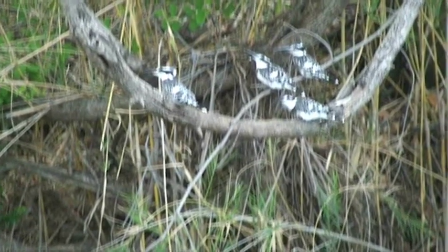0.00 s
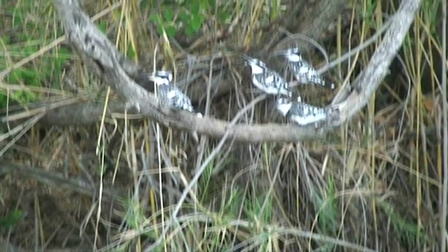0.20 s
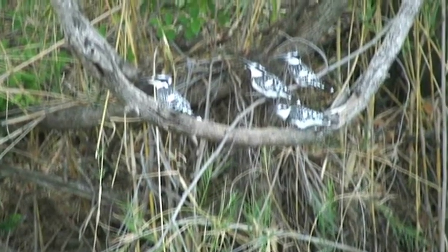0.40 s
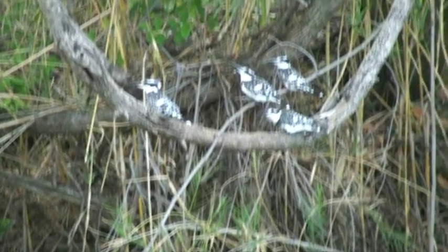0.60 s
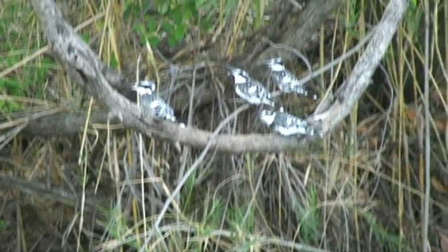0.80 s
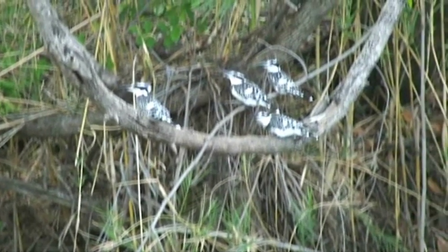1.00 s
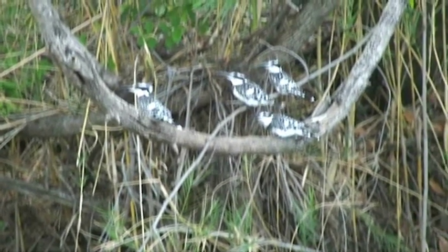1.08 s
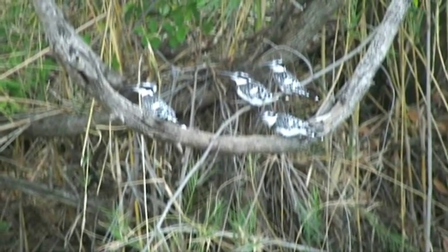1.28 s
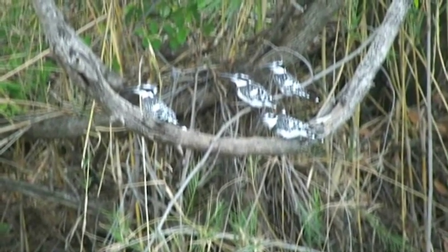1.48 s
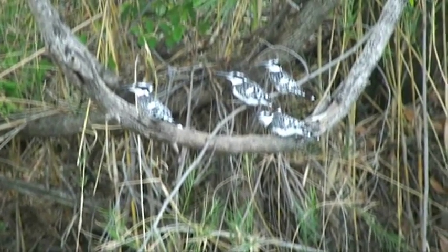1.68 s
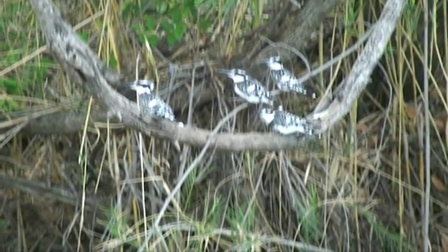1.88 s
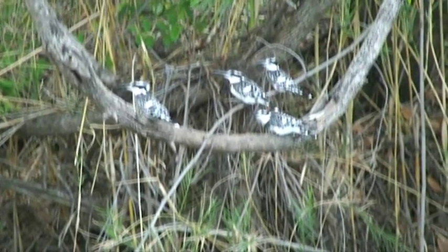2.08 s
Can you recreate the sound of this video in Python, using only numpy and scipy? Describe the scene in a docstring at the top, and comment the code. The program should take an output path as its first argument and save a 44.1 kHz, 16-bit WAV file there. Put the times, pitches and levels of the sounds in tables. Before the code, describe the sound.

Kingfisher calls: two piercing down-swept chirps, rapid short chattering notes, then faint distant chirps over river hiss

```python
"""A riverside: throughout, the river hisses as patchy noise, wind rumbles on the microphone as two swelling noise
bands, and a hum wavers as two narrow noise bands. From 0.24 s a near kingfisher in the reeds gives two falling
whistles and a quick chatter; faint notes follow from birds further off, at 1.35 s to the right and 1.99 s to the left.
Each note is a gliding tone with two weak overtones and broadband treble noise that follows its level, scattered back
by reeds and far bank."""
import sys
import numpy as np
from scipy import signal
from scipy.fft import rfft, irfft, next_fast_len
from scipy.io import wavfile
from scipy.ndimage import uniform_filter1d

SR = 44100
rng = np.random.default_rng(int(sys.argv[2]) if len(sys.argv) > 2 else 0)


def put_to_file(sound):
    """Save the sound as 16-bit audio at rate SR, in the file named by the first command-line argument."""
    columns = np.atleast_2d(sound).T  # one column per channel
    safe = np.clip(columns, -1, 1)
    whole_steps = np.round(safe * 32767)
    wavfile.write(sys.argv[1], SR, whole_steps.astype(np.int16))


N = 97020  # samples, 2.2 s


def amp(db):
    """Amplitude ratio of a level in dB: 20 dB a decade."""
    return 10 ** (np.asarray(db) / 20)


def unit(x):
    """Normalisation to an rms of 1."""
    return x / np.sqrt(np.mean(x ** 2) + 1e-20)


def along(points, hz):
    """Linear interpolation of (f/Hz, value) points on a logarithmic frequency axis."""
    f, value = np.transpose(points)
    return np.interp(np.log(hz + 1), np.log(f + 1), value)


def filtered(x, response):
    """Linear filtering: the spectrum is multiplied by a complex response of frequency."""
    padded = next_fast_len(N + SR // 2)
    return irfft(rfft(x, padded) * response(np.fft.rfftfreq(padded, 1 / SR)), padded)[..., :N]


def panned(db):
    """Interchannel level difference: left and right gains that differ by db."""
    return amp(np.array([db / 2, -db / 2]))


def correlated(pair, likeness, gain):
    """Mid-side mixing: independent noises at cos and sin of half an angle correlate as its cosine."""
    def response(hz):
        half_angle = np.arccos(along(likeness, hz)) / 2
        return gain(hz) * np.array([np.cos(half_angle), np.sin(half_angle)])

    mid, side = filtered(pair, response)
    return np.array([mid + side, mid - side])


def rush(spectrum, patchy_db, band=lambda hz: 1):
    """Turbulence noise: random stereo noise of rms 1 whose gain varies in patches of time and frequency."""
    # left-right correlation: f/Hz, likeness/1
    likeness = [(30, .62), (60, .72), (130, .95), (290, .85), (640, .55), (1400, .57), (3000, .5),
                (7000, .5), (15000, .85)]
    # left-right balance: f/Hz, level difference/dB
    balance = [(30, 2), (110, 1), (380, .6), (700, -1.2), (1300, -.9), (4400, -1.2), (8100, -1),
               (15000, .1)]
    cells = signal.stft(rng.standard_normal((2, N)), nperseg=512)[2]
    patches = uniform_filter1d(rng.standard_normal(cells.shape[1:]), 6, axis=0)
    patches = unit(uniform_filter1d(patches, 14, axis=1))
    pair = signal.istft(cells * amp(patchy_db * patches), nperseg=512)[1][:, :N]
    stereo = correlated(pair, likeness, lambda hz: band(hz) * amp(along(spectrum, hz)))
    return unit(filtered(stereo, lambda hz: panned(along(balance, hz))))


def river():
    """Broadband flow noise: the hiss of the river falls away toward the treble."""
    # relative spectrum: f/Hz, level/dB
    spectrum = [(170, -13), (260, -1), (500, 0), (750, -3.5), (1000, -6.5), (1600, -10.5), (2200, -14.5),
                (3200, -17), (5000, -19), (6300, -20.5), (8000, -26.5), (10000, -32.5), (13000, -42),
                (14700, -43), (15300, -58)]
    return amp(-41) * rush(spectrum, patchy_db=0.94)


def wind():
    """Turbulent pressure on the microphone: deep and upper rumble swell independently."""
    # relative spectrum: f/Hz, level/dB
    spectrum = [(10, -27), (22, -0.5), (40, -2.5), (130, -4.5), (200, -8), (260, -17.5), (330, -56)]
    # swells: t/s, deep rumble level/dB, upper rumble level/dB
    swells = [(0.0, -34.5, -44.5), (0.12, -38, -41.5), (0.14, -46.5, -48.5), (0.26, -40, -41),
              (0.35, -39, -49), (0.51, -47.5, -47), (0.53, -41, -42), (0.84, -40.5, -46),
              (0.86, -48.5, -42), (1.14, -45.5, -47.5), (1.19, -42.5, -41), (1.41, -46.5, -46.5),
              (2.14, -45.5, -48.5), (2.2, -49, -43)]
    split_hz = 110
    s, deep_db, upper_db = np.transpose(swells)
    t = np.arange(N) / SR
    deep = rush(spectrum, patchy_db=0.5, band=lambda hz: hz < split_hz)
    upper = rush(spectrum, patchy_db=1.5, band=lambda hz: hz >= split_hz)
    return amp(np.interp(t, s, deep_db)) * deep + amp(np.interp(t, s, upper_db)) * upper


def hum():
    """Narrow-band noise: a band of finite width is heard as a tone that wavers."""
    # bands: centre f/Hz, full width at half amplitude/Hz, level/dB, phase lead of left over right/rad
    bands = [(593.5, 22.5, -46.5, -0.59), (791, 66, -50.5, -1.95)]
    out = np.zeros((2, N))
    for hz, width_hz, db, lead in bands:
        def resonance(f):
            channel_phase = np.exp(.5j * lead * np.array([[1], [-1]]))
            return channel_phase / (1 + (2 * (f - hz) / width_hz) ** 2)

        out += amp(db) * unit(filtered(rng.standard_normal(N), resonance))
    return out


def note(rows):
    """Harmonic series on a gliding fundamental, and broadband treble noise that follows its level."""
    # third partial relative to the second: f of third partial/Hz, level/dB
    third_db = [(9000, -14), (11500, -13.5), (13500, -12), (15000, -31)]
    # relative spectrum of the treble noise: f/Hz, level per Hz/dB
    wash_spectrum = [(2000, -32), (3000, -17), (6000, 6.5), (9000, -2), (11000, -3), (15500, -11)]
    attack_s, release_s = .0006, .004
    wash_db = -30  # relative to the fundamental, in the straight sound
    t = np.arange(N) / SR
    s, hz, db, second_db = np.transpose(rows)
    pitch = uniform_filter1d(np.interp(t, s, hz), size=45)  # glide rounded over 1 ms
    phase = 2 * np.pi * np.cumsum(pitch) / SR
    gate = np.clip(np.minimum((t - s[0]) / attack_s, (s[-1] - t) / release_s) + .5, 0, 1)
    level = amp(np.interp(t, s, db))
    noise = unit(filtered(rng.standard_normal(N), lambda f: amp(along(wash_spectrum, f))))
    wash = level * amp(wash_db) * noise
    third_gain = amp(along(third_db, 3 * pitch)) * (3 * pitch < SR / 2)  # silent if it would alias
    overtones = np.sin(2 * phase) + third_gain * np.sin(3 * phase)
    tone = level * np.sin(phase) + amp(np.interp(t, s, second_db)) * overtones
    return gate * np.sqrt(2) * tone, gate * wash


def reeds(x, reeds_db, starts_s, t60, bank_db, delay_s, spread_s):
    """Diffuse scattering: echoes from near stems decay exponentially; the far bank answers in a later swell."""
    # left-right correlation of the echoes: f/Hz, likeness/1
    likeness = [(5500, 0.86), (8500, 0.38), (13000, .9)]
    # echo colour: f/Hz, gain/dB
    colour = [(2800, -1.5), (4500, -2), (7000, 1.5), (10000, 1), (14000, -4.5)]
    builds_s = 0.0014
    t = np.arange(SR // 2) / SR
    stems = (1 - np.exp(-np.clip(t - starts_s, 0, 9) / builds_s)) * amp(-60 * t / t60)
    bank = np.exp(-((t - delay_s) / spread_s) ** 2 / 2) * (t > starts_s)
    stems *= amp(reeds_db) / np.linalg.norm(stems)
    bank *= amp(bank_db) / np.linalg.norm(bank)
    scatter = rng.standard_normal((2, len(t))) * np.hypot(stems, bank)
    wet = signal.fftconvolve(x[None], scatter, axes=1)[:, :N]
    return correlated(wet, likeness, lambda hz: amp(along(colour, hz)))


def bird(notes, place):
    """Superposition of direct and scattered sound; every note has its own random scatter."""
    # treble balance of the microphone's left port: f/Hz, left-right level difference/dB
    port_balance = [(5500, -1), (8500, 2.5)]
    echo_wash_db = 11.5  # the treble noise is this much stronger in the echoes
    pan_db, reeds_db, echo_pan_db, *echo_times = place
    voices = [note(rows) for rows in notes]
    straight = sum(tone + wash for tone, wash in voices)
    wet = sum(reeds(tone + amp(echo_wash_db) * wash, reeds_db, *echo_times) for tone, wash in voices)
    heard = panned(pan_db)[:, None] * straight + panned(echo_pan_db)[:, None] * wet
    return filtered(heard, lambda hz: panned(along(port_balance, hz)))


def near_bird():
    """Frequency glides: two falling whistles and a chatter of shorter notes."""
    # one curve a note, before panning: t/s, f/Hz, level/dB, level of second partial/dB
    whistles = [
        [(0.236, 7370, -37, -72), (0.24, 7090, -32.5, -43), (0.245, 5920, -22.5, -42), (0.25, 5220, -19, -38),
         (0.2555, 4470, -14, -35.5), (0.265, 4170, -13, -26), (0.277, 3890, -19, -34), (0.282, 3780, -16, -38),
         (0.295, 3505, -29.5, -51), (0.31, 3600, -24, -50), (0.318, 3460, -33, -62), (0.326, 2970, -31, -60)],
        [(0.364, 6490, -24.5, -53), (0.368, 5775, -17.5, -33), (0.371, 4960, -16.5, -38),
         (0.374, 4620, -11.5, -26), (0.378, 4100, -18, -29), (0.385, 3540, -22.5, -43),
         (0.394, 3086, -29.5, -49), (0.403, 3005, -37, -51), (0.412, 2996, -29, -59)],
    ]
    chatter = [
        [(0.351, 5700, -37, -56), (0.354, 5850, -24, -43), (0.358, 6430, -31, -45)],
        [(0.359, 7490, -32, -80), (0.364, 7090, -33, -63)],
        [(0.4935, 3580, -34, -72), (0.496, 4410, -22, -37), (0.499, 4830, -15, -37), (0.502, 4670, -19, -41),
         (0.506, 4370, -24, -38), (0.511, 4380, -30, -40)],
        [(0.525, 7410, -44, -60), (0.529, 7060, -29, -50)],
        [(0.529, 5850, -28, -55), (0.532, 5700, -18, -41), (0.536, 5020, -16, -45), (0.54, 4400, -14.5, -29),
         (0.543, 3810, -23, -31.5), (0.546, 3280, -33, -45), (0.555, 3060, -33, -67)],
        [(0.579, 5430, -32, -67), (0.582, 5120, -20, -48), (0.584, 4500, -19, -38), (0.588, 3890, -24, -34),
         (0.591, 3120, -33.5, -47), (0.595, 2570, -42, -73)],
        [(0.621, 6510, -38, -63), (0.624, 5920, -30.5, -64), (0.628, 5250, -18, -40), (0.63, 4740, -19, -47),
         (0.634, 3860, -20.5, -32), (0.638, 2930, -41, -57), (0.643, 2660, -36, -72)],
        [(0.6605, 3780, -44, -47), (0.662, 3930, -20.5, -47), (0.666, 4210, -24, -49),
         (0.67, 3780, -22.5, -38.5), (0.672, 3180, -38.5, -51), (0.676, 2580, -32.5, -66)],
    ]
    # place: left-right/dB, reeds/dB, left-right of echoes/dB, reeds start/s, reeds t60/s,
    # far bank/dB, bank delay/s, bank spread (standard deviation)/s
    place = (-2.5, -5.5, -1.5, .007, 0.28, -19, .06, 0.07)
    return bird(list(whistles) + list(chatter), place)


def right_bird():
    """Level difference places this fainter bird to the right."""
    # notes and place, columns as in near_bird
    notes = [
        [(1.346, 4160, -60, -72), (1.354, 4170, -56, -64), (1.361, 4220, -49, -57), (1.367, 5400, -41, -72)],
        [(1.369, 4290, -46, -59), (1.374, 6490, -44.5, -82), (1.379, 7470, -49, -80), (1.383, 6260, -40, -83),
         (1.386, 4620, -35.5, -50), (1.39, 4220, -42, -44), (1.397, 4410, -58, -68), (1.402, 4130, -37, -59),
         (1.406, 4180, -49, -57)],
    ]
    place = (-4, 1.5, -2.5, .002, .1, -.6, .075, .04)
    return bird(notes, place)


def left_bird():
    """Level difference places this fainter bird to the left."""
    # notes and place, columns as in near_bird
    notes = [
        [(1.993, 3450, -47, -80), (1.997, 3810, -55, -67), (2.001, 5060, -36.5, -71), (2.005, 5830, -45, -80),
         (2.011, 6570, -43.5, -74), (2.017, 6570, -50, -80), (2.021, 6050, -54, -78), (2.025, 4880, -36, -78),
         (2.029, 4890, -52, -70), (2.036, 5030, -35.5, -78), (2.043, 4790, -43, -69), (2.048, 4530, -46, -63),
         (2.055, 3100, -62, -83)],
    ]
    place = (3.5, -16, .3, .01, .1, -2.5, .07, .036)
    return bird(notes, place)


def scene():
    """Superposition: the sound pressures of all sources add."""
    return river() + wind() + hum() + near_bird() + right_bird() + left_bird()


def record(dry):
    """Band limitation: the camera keeps nothing above its upper frequency limit."""
    top_hz = 15700
    return filtered(dry, lambda hz: hz < top_hz)


dry = scene()
out = record(dry)
put_to_file(out)
```